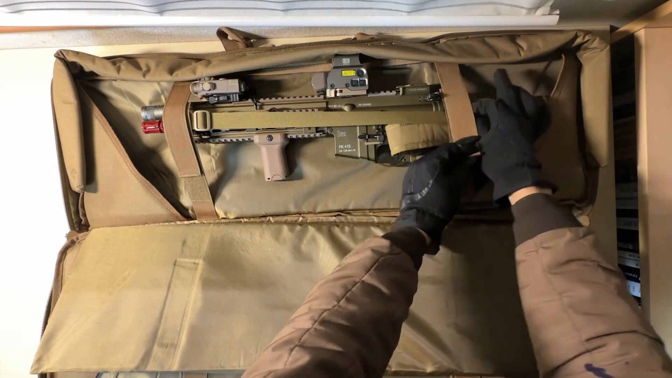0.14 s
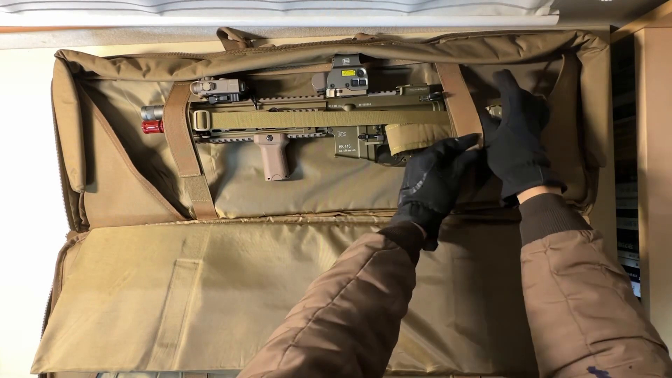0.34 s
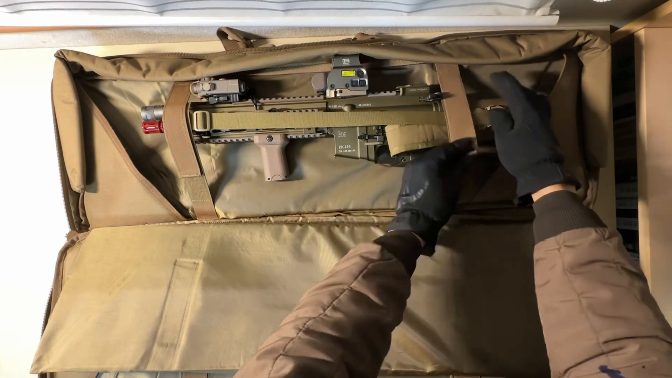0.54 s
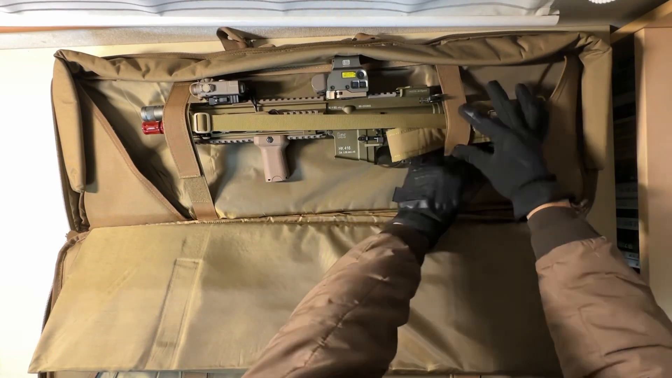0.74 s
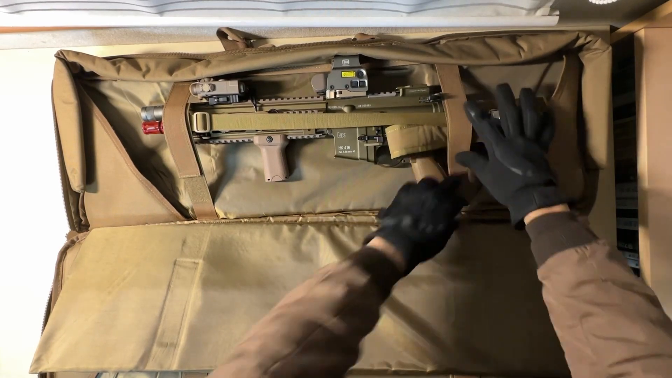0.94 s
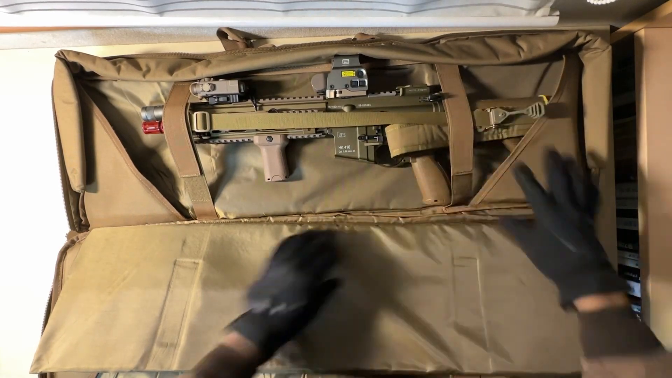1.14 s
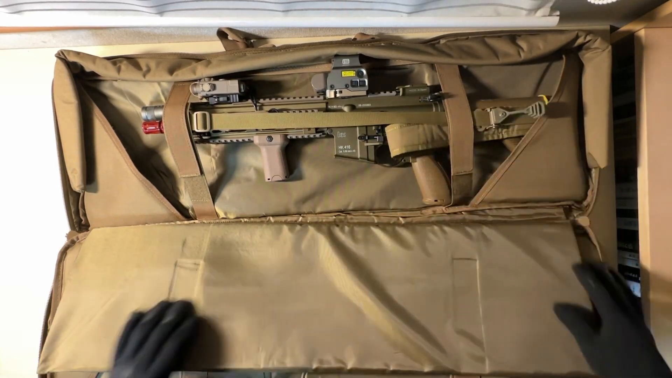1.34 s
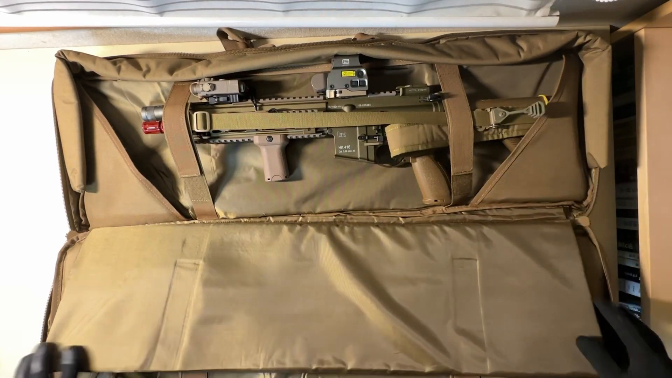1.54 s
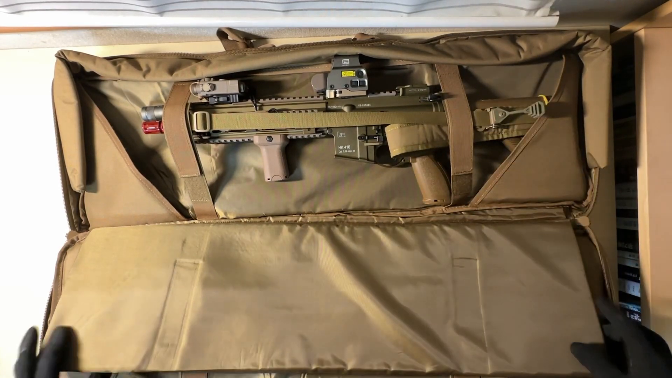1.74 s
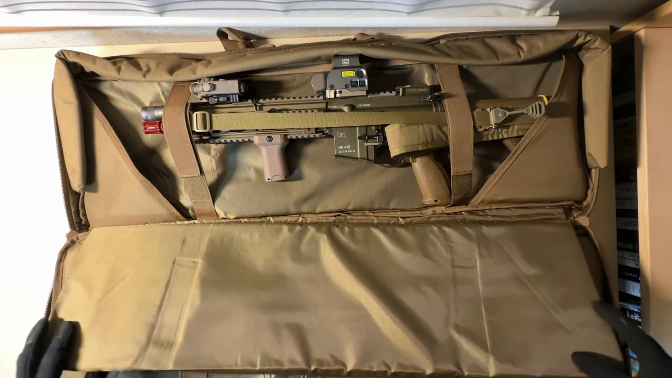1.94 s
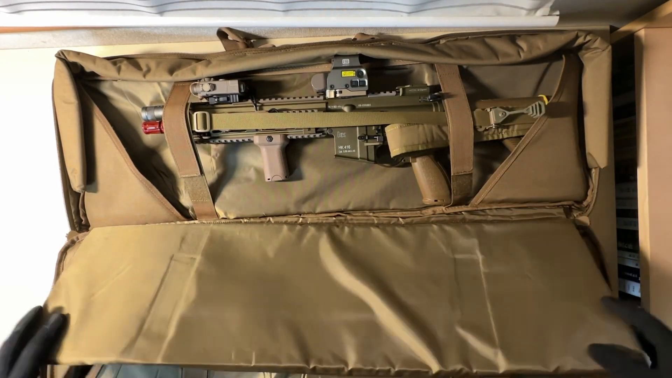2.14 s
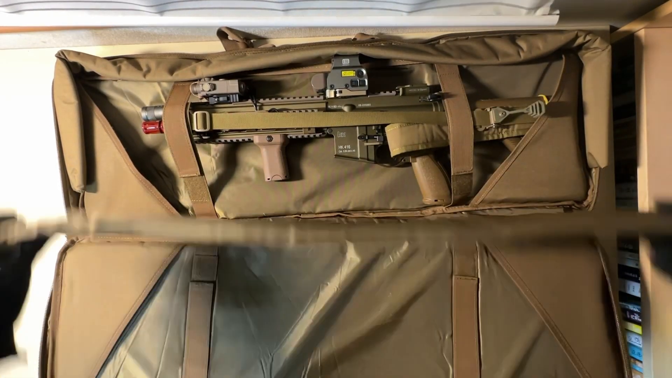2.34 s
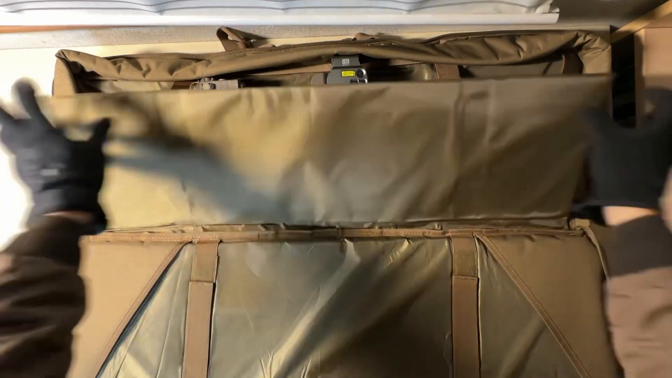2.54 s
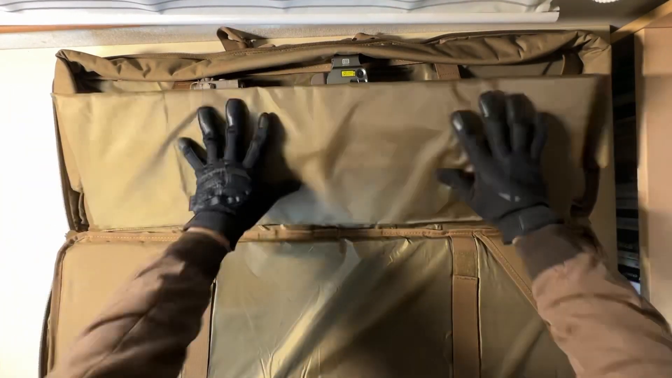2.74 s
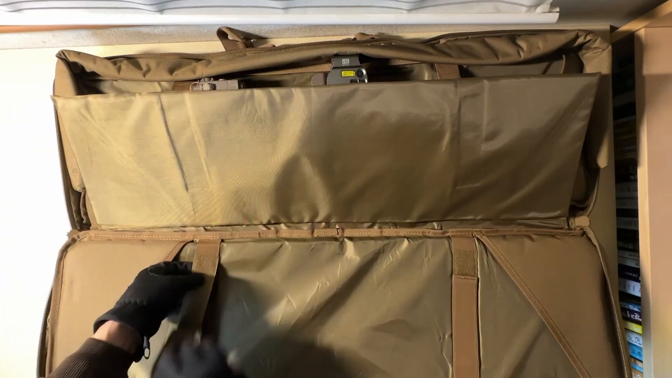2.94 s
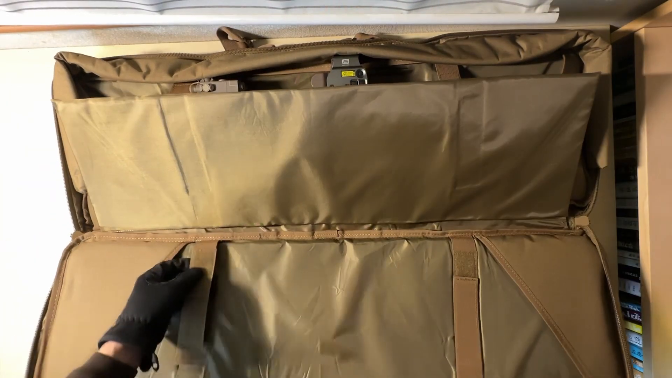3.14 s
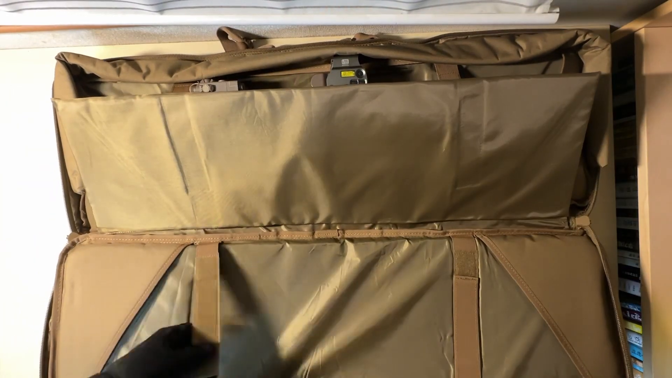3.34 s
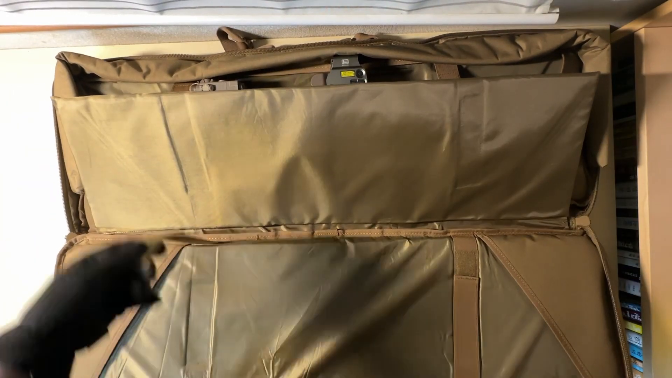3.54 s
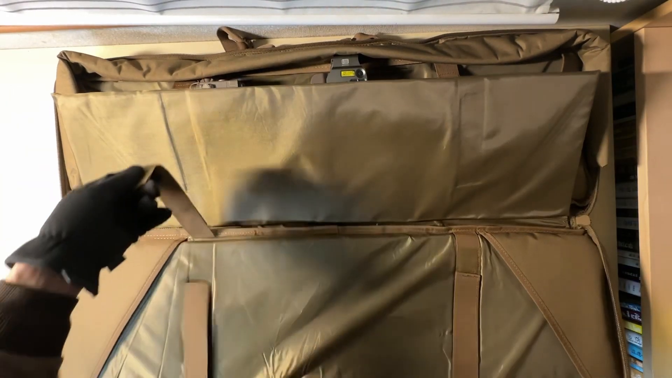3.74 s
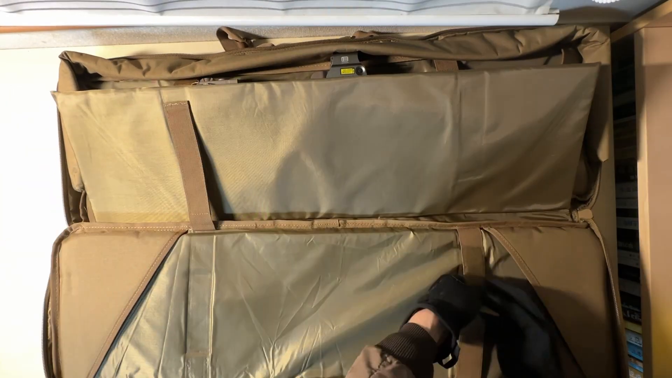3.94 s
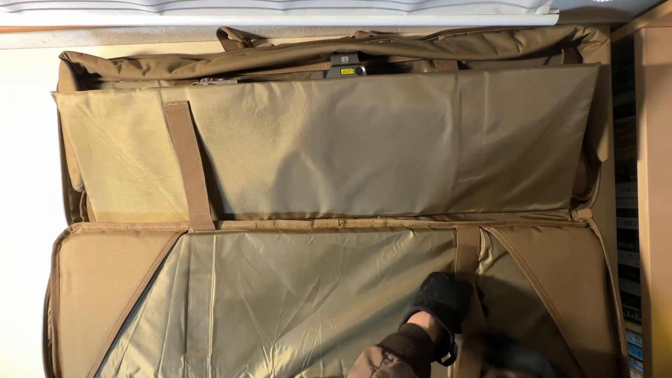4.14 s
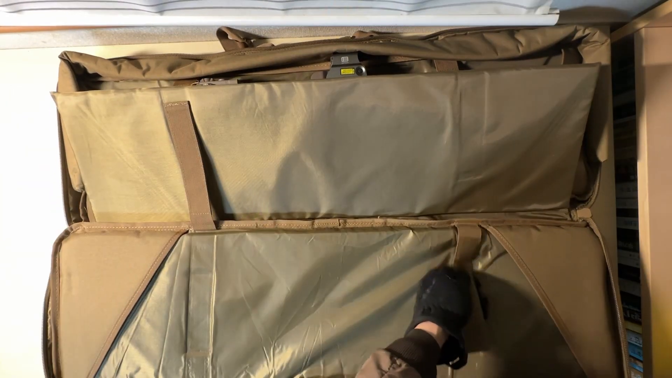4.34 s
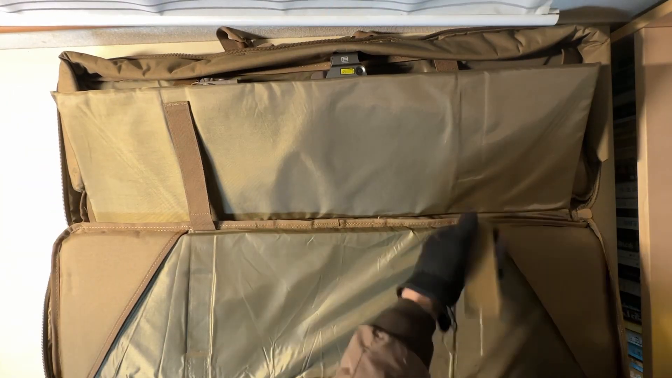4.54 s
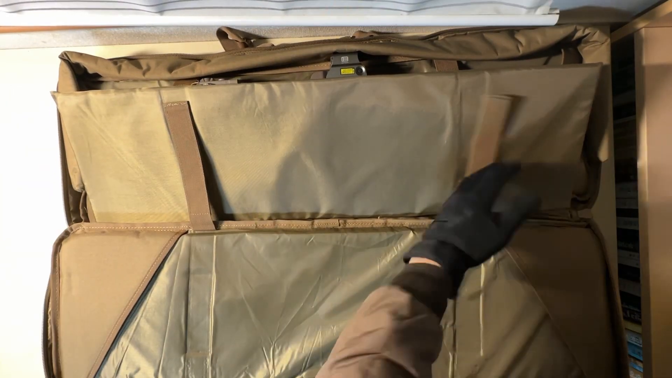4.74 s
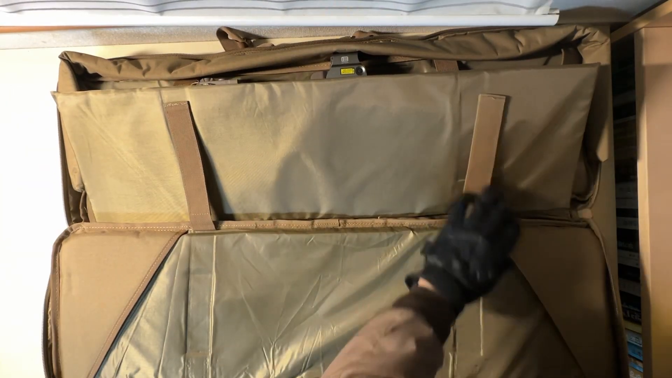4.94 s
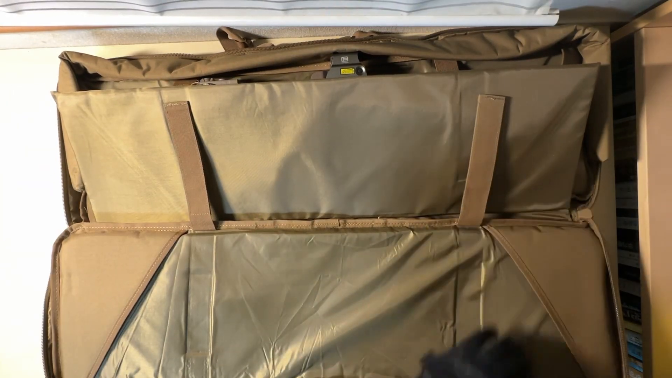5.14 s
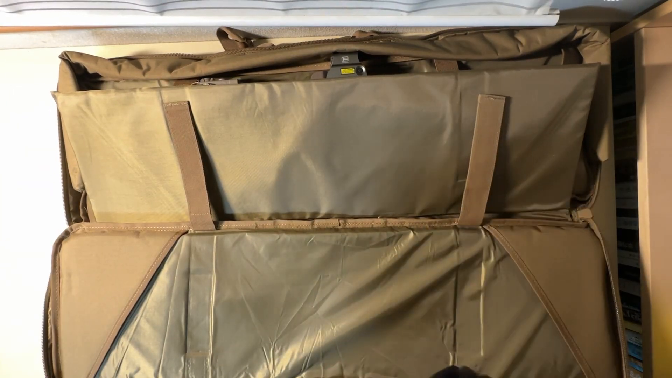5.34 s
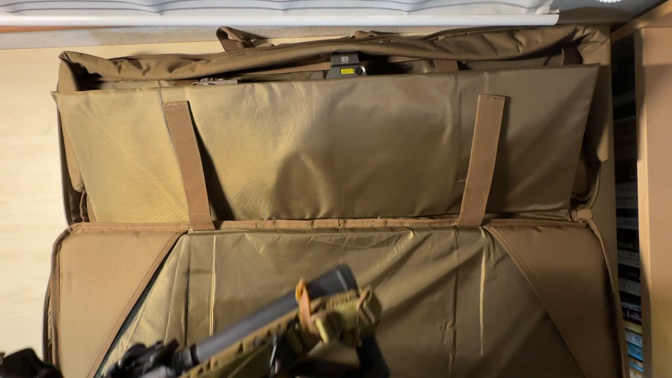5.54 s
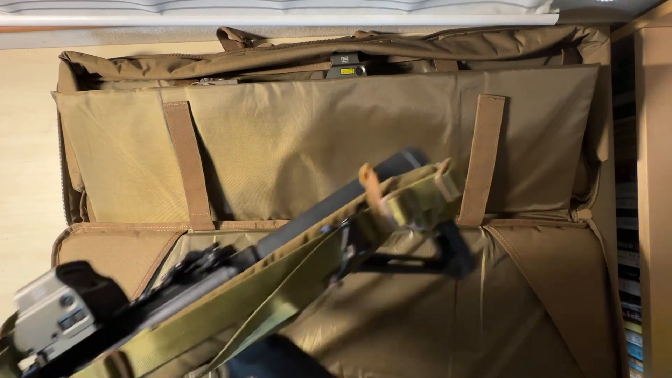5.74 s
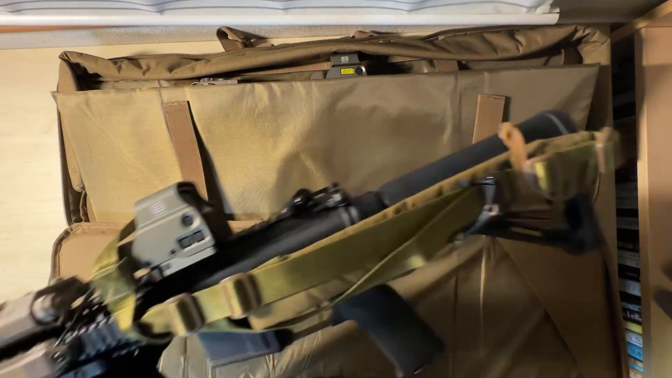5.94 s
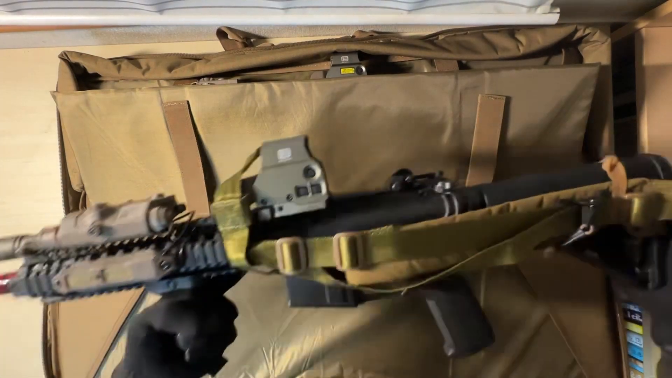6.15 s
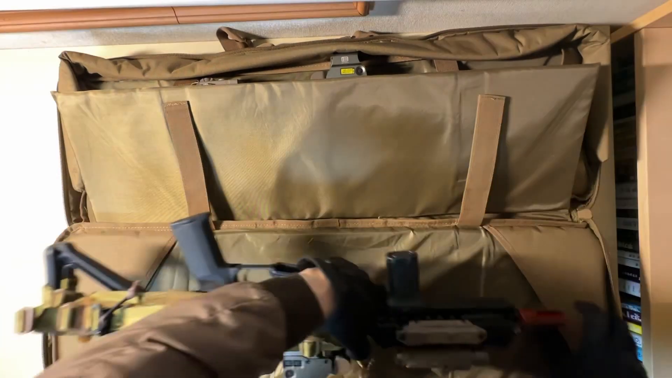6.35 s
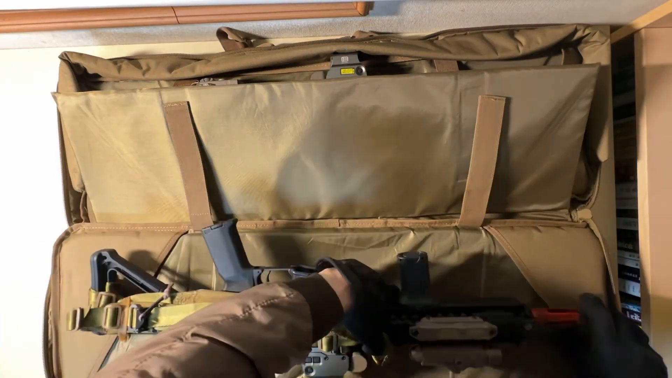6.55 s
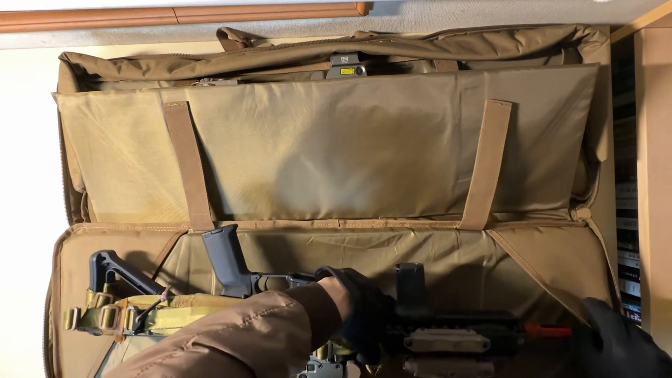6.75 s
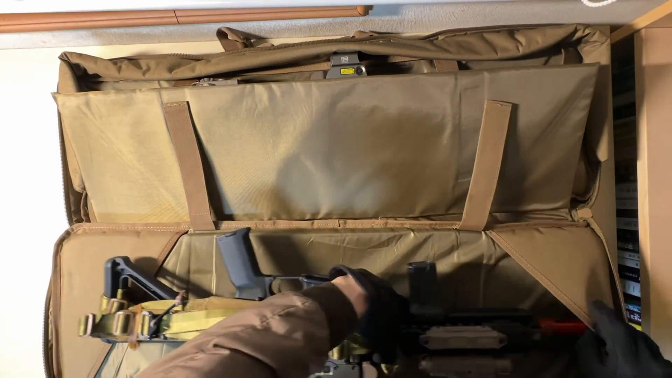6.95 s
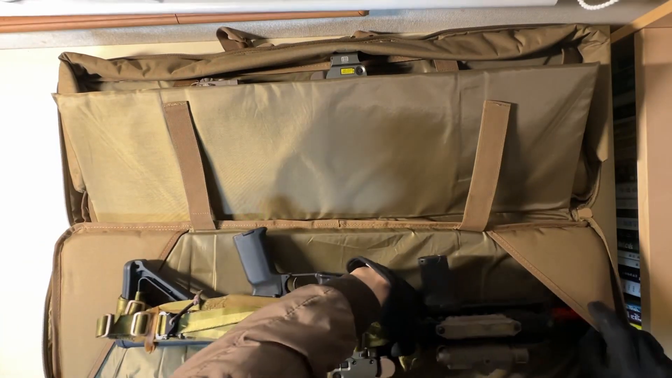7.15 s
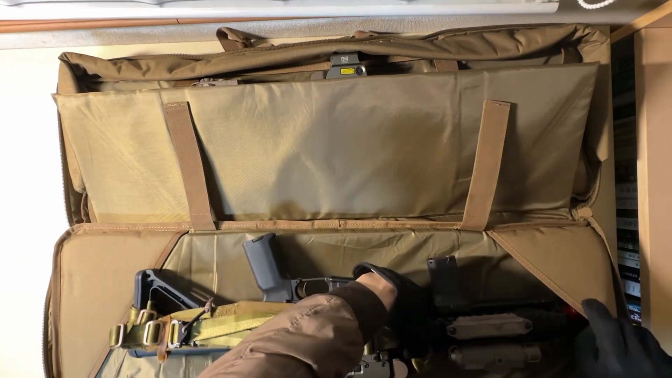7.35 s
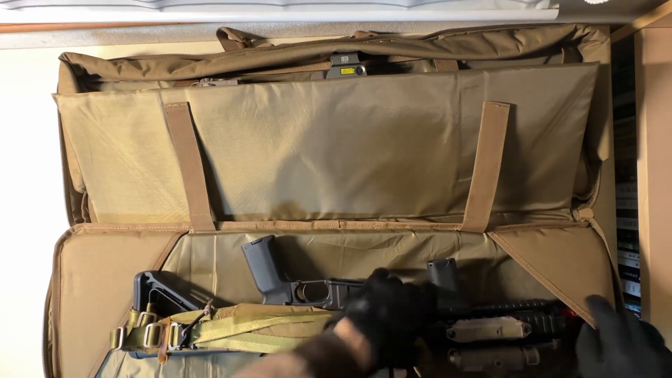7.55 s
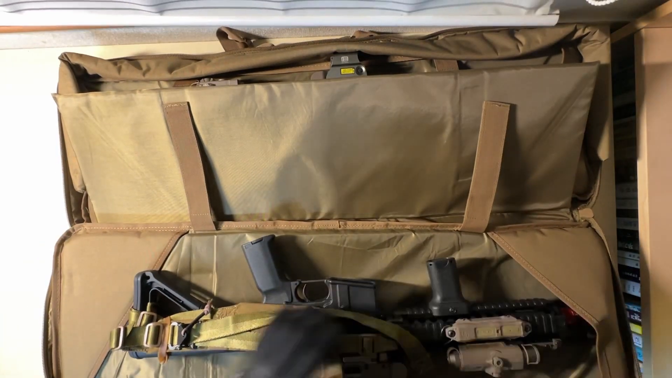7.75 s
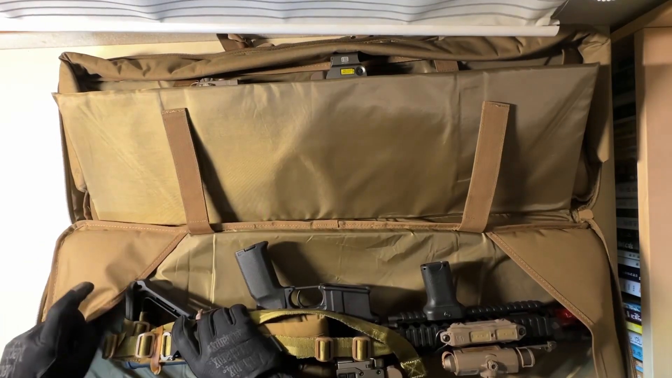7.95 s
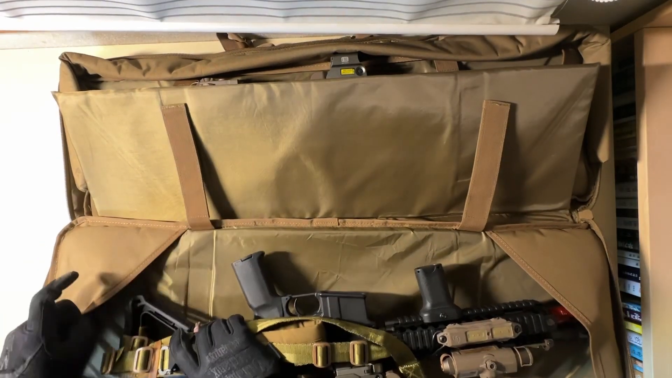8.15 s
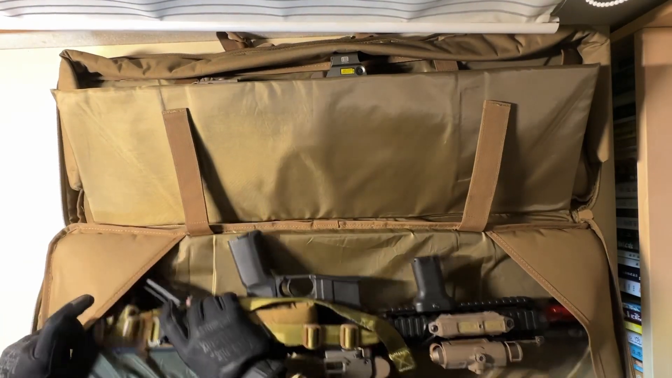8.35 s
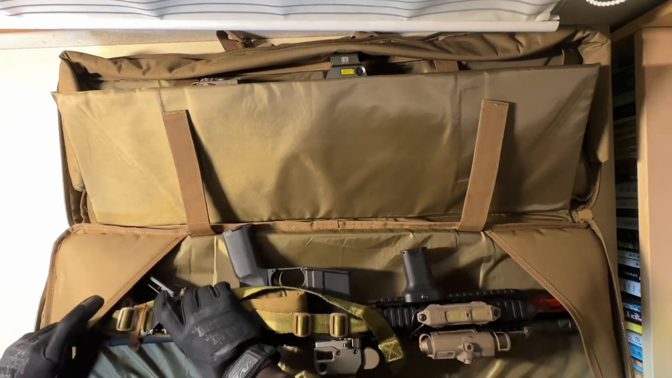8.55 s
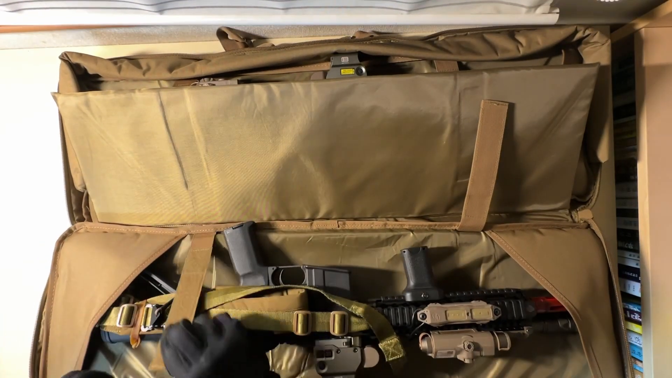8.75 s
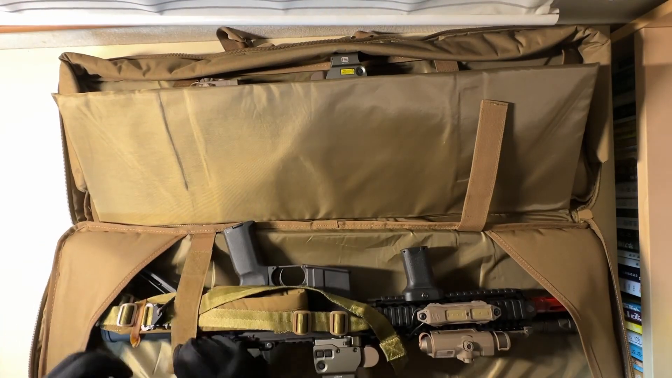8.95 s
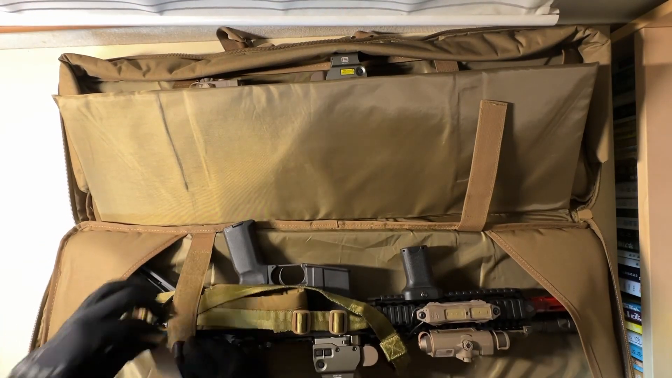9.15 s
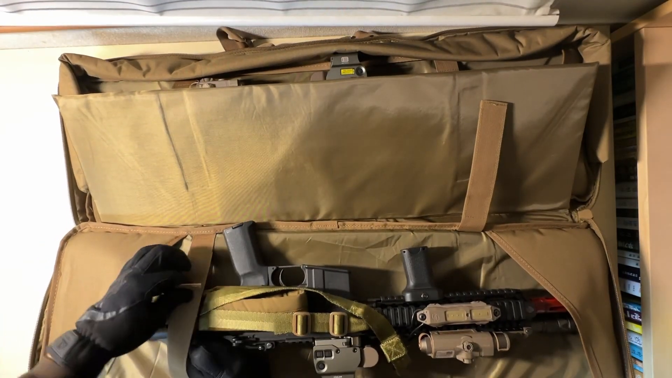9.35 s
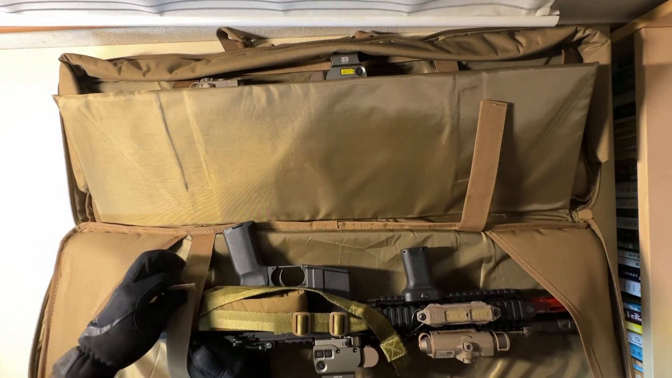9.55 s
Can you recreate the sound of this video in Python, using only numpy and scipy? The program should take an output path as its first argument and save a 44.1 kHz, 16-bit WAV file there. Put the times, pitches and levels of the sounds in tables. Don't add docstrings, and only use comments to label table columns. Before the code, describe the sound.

Quiet nylon rustling, then a loud hook-and-loop strap rips open, buckles rattle, a second strap tears and slaps down, followed by soft cloth handling and taps.

```python
import sys
import numpy as np
from scipy import signal
from scipy.io import wavfile
from scipy.ndimage import uniform_filter1d

SR = 44100
rng = np.random.default_rng(int(sys.argv[2]) if len(sys.argv) > 2 else 0)


def store_wav(level_fs):
    pcm = np.round(np.clip(np.atleast_2d(level_fs), -1, 1) * 32767)
    wavfile.write(sys.argv[1], SR, pcm.T.astype(np.int16))


def rack_gain(trim_db):
    fader = np.asarray(trim_db, float)
    return 10 ** (fader / 20)


N = 422911
SPAN_DB = 20


def evened(x):
    return x / np.sqrt(np.mean(x ** 2) + 1e-20)


def read(points, hz):
    f, value = np.transpose(points)
    return np.interp(np.log(hz + 1), np.log(f + 1), value)


def add(mix, s, sound):
    part = mix[max(round(s * SR), 0):][:len(sound)]
    part += sound[:len(part)]


def add_peak(mix, s, db, sound):
    add(mix, s, rack_gain(db) * sound / abs(sound).max())


def colour(x, points, lo_hz=20, hi_hz=20000):
    hz = np.fft.rfftfreq(4096, 1 / SR) + 1
    edges = np.sqrt((1 + (lo_hz / hz) ** 8) * (1 + (hz / hi_hz) ** 8))
    log_gain = np.log(rack_gain(read(points, hz)) / edges + 1e-5)
    full = signal.hilbert(np.r_[log_gain, log_gain[-2:0:-1]])
    impulse = np.fft.ifft(np.exp(np.conj(full))).real[:3000]
    return evened(signal.oaconvolve(x, impulse)[:N])


def resonate(x, hz, width_hz):
    turn = np.exp(2j * np.pi * hz * np.arange(len(x)) / SR)
    r = np.exp(-np.pi * width_hz / SR)
    return 2 * (turn * signal.lfilter([1 - r], [1, -r], x / turn)).real


def steep(x, hz, width_hz):
    return resonate(resonate(x, hz, width_hz), hz, 3 * width_hz)


def flutter(per_s, count=N):
    noise = uniform_filter1d(rng.standard_normal(count), size=40)
    return evened(signal.lfilter([1], [1, -np.exp(-2 * np.pi * per_s / SR)], noise))


def snaps(per_s, spread_db):
    size = rack_gain(spread_db * np.minimum(rng.exponential(1, N), 4))
    return size * rng.standard_normal(N) * (rng.random(N) < per_s / SR)


def patchy(x, patchy_db):
    z = signal.stft(x, nperseg=512)[2]
    patches = uniform_filter1d(rng.standard_normal(z.T.shape), size=9, axis=0)
    patches = uniform_filter1d(patches, size=5, axis=1)
    return signal.istft(z * rack_gain(patchy_db * evened(patches).T), nperseg=512)[1][:N]


def swells(rows, breaks_s):
    t = np.arange(0, N, 32) / SR
    breaks_s = np.sort(breaks_s)
    s, db, rise_s, fall_s = np.transpose(rows)[:, :, None]
    gain = rack_gain(db - SPAN_DB * np.maximum((s - t) / rise_s, (t - s) / fall_s))
    gain = gain * (np.searchsorted(breaks_s, s) == np.searchsorted(breaks_s, t))
    return np.interp(np.arange(N) / SR, t, uniform_filter1d((gain ** 2).sum(0), size=14))


def blows(rows, sag, sag_s, rise_s):
    out, t = np.zeros(N), np.arange(round(.4 * SR)) / SR
    for s, db, hz, t60_s in rows:
        turns = np.cumsum(hz * (1 + sag * np.exp(-t / sag_s))) / SR
        swing = np.sin(2 * np.pi * turns) * rack_gain(-60 * t / t60_s) * (1 - np.exp(-t / rise_s))
        add_peak(out, s, db, swing)
    return out


# time in seconds, level in dB.
STRAP_BACKING_LEVELS = [
    [(2.878, -34), (3.08, -28.5), (3.1, -37)],
    [(4.032, -39), (4.118, -29.5), (4.338, -34), (4.37, -29)],
]
# peak in seconds, peak in dB, build-up in seconds.
FIRST_STRAP_TEARS = [(2.881, -13.5, 0.0044), (2.903, -7.5, 0.0069), (2.9234, -9, 0.0074),
                     (2.9464, -4, 0.011), (2.962, -2.5, 0.0084), (2.983, -2.5, 0.016), (2.997, -3.5, 0.01),
                     (3.011, -2.5, 0.0081), (3.0254, -8.5, 0.0051), (3.046, 0, 0.015), (3.072, 0.5, 0.0066)]
SECOND_STRAP_TEARS = [(4.032, -17, 0.0024), (4.041, -17.5, .002), (4.133, -12.5, .006), (4.249, -10, .002),
                      (4.0603, -14.5, 0.0012), (4.076, -9.5, 0.0033), (4.102, -6.5, 0.0014),
                      (4.1204, -9.5, 0.0062), (4.1454, -10.5, 0.011), (4.163, -4.5, 0.01),
                      (4.182, -9.5, 0.015), (4.1984, -8, 0.0041), (4.2114, -8, 0.0076),
                      (4.236, -12, 0.0022), (4.2418, -0.5, 0.0024), (4.272, -8.5, 0.0056),
                      (4.292, -8, 0.0087), (4.307, -10, .001), (4.313, -8, 0.0024), (4.3287, -8.5, 0.0069),
                      (4.347, -12, 0.0091)]
# frequency in Hz, density in dB per Hz.
HOOK_SPECTRA = [
    [(880, -18.5), (1500, -13), (1840, -35.5), (2260, -21), (3150, -7), (3610, 0.5), (5560, 2),
     (7450, -1.5), (9700, 0.5), (15500, -11)],
    [(880, -24.5), (1500, -18.5), (2400, -5.5), (2750, -13), (3410, -4.5), (5290, -3), (6190, -2.5),
     (7380, -4), (9890, 2), (15500, -17)],
]
# frequency in Hz, density in dB per Hz.
BACKING_SPECTRUM = [(88, -28.5), (150, -5.5), (295, -10.5), (339, 0), (441, -9), (487, -3), (3000, -10.5),
                    (3900, -28.5), (6600, -120)]


def straps():
    t, power = np.arange(N) / SR, np.zeros(N)
    for s, db, build_s in FIRST_STRAP_TEARS + SECOND_STRAP_TEARS:
        near = slice(round((s - .03) * SR), round((s + .1) * SR))
        since = t[near] - s - .002
        power[near] += rack_gain(db - 12.5) ** 2 * np.exp(np.where(since < 0, since / build_s, -since / 0.0033))
    first = t < 3.5
    start_s = [rows[0][0] for rows in STRAP_BACKING_LEVELS]
    pull = np.sqrt(power) * rack_gain(np.where(first, 1.1, 1.8) * flutter(150))
    pull *= np.where(first, t > start_s[0], t > start_s[1])

    hooks = patchy(np.where(first, snaps(20000, 1.2), snaps(14000, 1.6)), 1.7)
    hooks = np.where(first, colour(hooks, HOOK_SPECTRA[0]), colour(hooks, HOOK_SPECTRA[1]))

    backing_gain = np.zeros(N)
    for rows in STRAP_BACKING_LEVELS:
        s, db = np.transpose(rows)
        backing_gain += rack_gain(np.interp(t, s, db)) * (t >= s[0]) * (t < s[-1])
    backing_gain = uniform_filter1d(backing_gain, size=60)
    jerks = pull / (uniform_filter1d(pull, size=3000) + 1e-9)
    backing = colour(snaps(5000, 1.7), BACKING_SPECTRUM)
    return pull * hooks + backing_gain * jerks ** 0.72 * backing


# start in seconds, peak in dB, low ring in Hz, tick in dB, t60 in seconds.
BUCKLE_KNOCKS = [(0.765, -38.5, 790, -56, 0.19), (2.594, -37.5, 590, -53, 0.099),
                 (3.163, -28, 1247, -48, 0.07), (3.177, -32, 1180, -53, 0.1), (3.26, -24, 1310, -55, 0.1),
                 (3.318, -8.5, 950, -36, 0.074), (3.359, -18.5, 830, -53, 0.13),
                 (3.679, -24.5, 720, -13.5, 0.055), (3.7105, -21, 800, -24.5, 0.2),
                 (3.778, -19.5, 920, -40, 0.12), (3.834, -31, 664, -53, 0.021),
                 (6.118, -29, 790, -43, 0.04), (6.147, -26.5, 890, -52, 0.034),
                 (6.511, -37, 1000, -43, 0.084), (7.043, -28, 1080, -40, 0.074),
                 (7.212, -29.5, 1280, -43, 0.027), (7.275, -29, 1280, -36, 0.022)]
# start in seconds, peak in dB, high ring in Hz, tick in dB, t60 in seconds.
SMALL_CLICKS = [(0.293, -39, 2280, -36, 0.04), (0.4, -35, 1610, -24, 0.02),
                (0.431, -30, 4500, -15.5, 0.032), (4.705, -21, 1500, -21, 0.034),
                (1.278, -35, 2080, -37, 0.63), (2.438, -32, 3250, -37, 0.018),
                (3.231, -29, 1390, -52, 0.048), (5.5073, -37, 3560, -48, 0.056),
                (0.192, -43, 2440, -35, 0.033), (8.5257, -33, 1680, -60, 0.082),
                (8.572, -35, 1730, -52, 0.03), (6.409, -44.5, 2080, -66, 0.067),
                (6.526, -33, 1610, -55, 0.11), (7.179, -37, 2340, -49, 0.045),
                (8.503, -36.5, 3930, -35, 0.03), (8.585, -34, 1610, -38, 0.051),
                (8.982, -32.5, 1680, -53, 0.076), (9.0375, -22.5, 1700, -53, 0.096),
                (9.268, -34, 2300, -30, 0.04)]
SHELL_HZ = 1430


def knocks():
    out, t = np.zeros(N), np.arange(round(.15 * SR)) / SR
    rows = [(s, db, hz, SHELL_HZ, tick_db, t60_s) for s, db, hz, tick_db, t60_s in BUCKLE_KNOCKS]
    rows += [(s, db, 0, hz, tick_db, t60_s) for s, db, hz, tick_db, t60_s in SMALL_CLICKS]
    tick_band = signal.butter(2, [2800, 9000], "bandpass", fs=SR)
    for s, db, low_hz, high_hz, tick_db, t60_s in rows:
        strikes = rng.standard_normal(len(t)) * rack_gain(-60 * t / t60_s) * (1 - np.exp(-t / .0004))
        strikes *= 1 + 1.2 * np.exp(-t / .003)
        ring = 0.63 * steep(strikes, high_hz, 360) + 0.058 * steep(strikes, 1.6 * high_hz, 510)
        if low_hz > 0:
            ring += steep(strikes, low_hz, 330)
        add_peak(out, s, db, ring)
        add_peak(out, s, tick_db, signal.lfilter(*tick_band, strikes))
    return out


# start in seconds, peak in dB, final pitch in Hz, t60 in seconds.
STRAP_SLAPS = [
    (4.7058, -9, 380, .025),
    (3.6805, -17, 335, .06),
]


def slaps():
    return blows(STRAP_SLAPS, sag=1.8, sag_s=.0012, rise_s=.0011)


# start in seconds, peak in dB, pitch in Hz, t60 in seconds.
PADDING_THUMPS = [(0.431, -26.5, 334, 0.069), (0.767, -31.5, 458, 0.074), (1.276, -42.5, 310, 0.14),
                  (2.6, -26, 217, 0.039), (2.785, -22, 299, 0.15), (3.131, -16, 380, 0.04),
                  (3.151, -19.5, 221, 0.073), (3.272, -20.5, 150, 0.18), (3.274, -17.5, 372, 0.087),
                  (3.684, -24, 345, 0.12), (4.716, -32, 430, 0.059), (6.512, -32.5, 373, 0.095),
                  (8.582, -34.5, 470, 0.13), (9.034, -22, 149, 0.095)]


def thumps():
    out, t = np.zeros(N), np.arange(round(.2 * SR)) / SR
    for s, db, hz, t60_s in PADDING_THUMPS:
        crumpling = rng.standard_normal(len(t)) * rack_gain(-60 * t / t60_s)
        push = t / 0.0012 * np.exp(-t / 0.00027) + 0.12 * crumpling
        swing = steep(push, hz, 6.5 / t60_s + 40)
        swing += 0.22 * steep(push, 0.628 * hz, 57) + 0.19 * steep(push, 1.563 * hz, 214)
        add_peak(out, s, db, swing)
    return out


# peak in seconds, peak in dB, pitch in Hz, rise in seconds, fall in seconds.
WEAVE_TAPS = [(6.119, -28, 1890, 0.0025, 0.011), (6.12, -35, 4000, .002, .006),
              (6.1375, -30, 1700, 0.0023, .005), (6.148, -24, 1880, .002, .006),
              (6.154, -36, 2000, 0.0026, 0.0071), (6.1665, -25.5, 1770, .002, 0.0067),
              (6.1928, -31, 2070, 0.002, .005), (6.198, -36, 2490, .003, 0.0086),
              (6.501, -34, 3020, 0.00084, .006), (6.512, -28.5, 4200, .001, .005),
              (6.518, -31, 3200, .002, .005), (6.526, -26, 3800, 0.00092, .004),
              (6.529, -25, 2200, .002, 0.0045), (6.535, -24, 4500, 0.0027, 0.0046),
              (6.534, -24, 1800, 0.0033, 0.0068), (6.54, -26, 1690, .003, .006),
              (8.501, -26.5, 4300, .001, 0.0045), (8.587, -36.5, 4500, .002, 0.0092),
              (8.587, -28, 1410, .002, 0.0071), (4.383, -28, 1200, 0.0053, .008),
              (.4355, -15, 4530, .001, .004), (.158, -42, 2800, .002, .008),
              (2.599, -41, 1500, 0.0018, .015), (3.712, -27, 1490, .002, .015)]
GRIT_BURSTS = [(3.168, -27, 1700, .012, .015), (3.18, -23.5, 1250, .01, .02), (3.19, -31, 1850, .02, 0.027),
               (3.233, -36, 1700, .008, .03), (3.263, -21, 1420, .012, 0.014),
               (3.29, -26.5, 1390, .03, 0.043), (3.323, -17, 1560, .006, 0.018),
               (3.328, -33, 2770, .01, 0.026), (3.342, -22, 1490, .02, 0.026),
               (3.37, -23, 990, .015, 0.026), (3.385, -38.5, 1880, .03, 0.053),
               (4.713, -22, 1310, .004, 0.0079), (4.735, -37.5, 1090, .03, 0.042),
               (.312, -33.5, 2070, .02, .01), (.4, -37, 2800, .03, .015), (.2, -39, 2480, .04, 0.041),
               (6.565, -35, 1400, .02, 0.034),
               (4.728, -30, 260, .02, .08), (5.42, -40, 200, .06, .08), (5.465, -41, 230, .06, .02),
                 (5.04, -36, 230, .03, .08), (2.599, -30, 700, .006, .015), (2.614, -27, 450, .008, .03),
                 (2.772, -29, 400, .015, .03), (2.794, -30, 3500, .001, .006), (2.8, -23, 500, .015, .04),
                 (3.692, -26, 3000, .008, .012), (3.684, -24, 4800, .004, .04),
                 (3.715, -29, 6600, .005, .02), (3.765, -30, 1200, .03, .03), (3.768, -33, 6500, .03, .02),
                 (3.837, -27, 800, .04, .006), (3.797, -34, 5600, .01, .02), (7.181, -33, 6000, .002, .008),
                 (7.213, -30, 5000, .001, .006), (7.277, -26, 4000, .001, .004),
                 (5.785, -42, 4800, .02, .05), (.682, -39, 520, .004, .03), (.954, -41, 540, .004, .03),
                 (6.305, -48, 5500, .01, .015), (6.39, -49, 3500, .01, .02), (9.29, -38, 9000, .005, .02),
                 (9.3, -37, 4800, .03, .02), (9.427, -46, 7000, .003, .015), (9.482, -40, 8500, .03, .02),
                 (9.01, -40, 1000, .03, .03), (9.237, -43, 4800, .003, .01), (4.709, -17, 750, .003, .008),
                 (5.51, -36, 3400, .012, .02), (5.16, -46, 3600, .03, .05), (1.84, -44, 800, .02, .04),
                 (1.87, -45, 4500, .03, .04), (.445, -26, 4400, .02, .03), (2.904, -14, 5000, .002, .004),
                 (2.881, -20, 6000, .001, .006)]


def rasps():
    out, t = np.zeros(N), np.arange(-.05, .1, 1 / SR)
    for s, db, hz, rise_s, fall_s in WEAVE_TAPS + GRIT_BURSTS:
        grit = rng.standard_normal(len(t)) * rack_gain(-SPAN_DB * np.maximum(-t / rise_s, t / fall_s))
        ring = steep(grit, hz, 0.38 * hz) + 0.093 * steep(grit, 1.89 * hz, 0.5 * hz)
        add_peak(out, s + t[0], db, ring)
    return out


# start in seconds, peak in dB.
LOOP_SNAGS = [(.021, -31.5), (0.232, -40), (.417, -27), (0.45, -20), (.563, -40.5), (4.915, -35),
              (4.934, -38), (4.948, -33), (4.975, -35), (7.868, -51), (9.206, -42), (9.305, -31.5),
              (9.3397, -28.5), (9.469, -43), (9.4985, -30.5)]


def snags():
    out, t = np.zeros(N), np.arange(round(.05 * SR)) / SR
    band = signal.butter(1, [3000, 11000], "bandpass", fs=SR)
    for s, db in LOOP_SNAGS:
        crackle = rng.standard_normal(len(t)) * rack_gain(-60 * t / 0.036)
        add_peak(out, s, db, signal.lfilter(*band, crackle))
    return out


# frequency in Hz, density in dB per Hz.
CLOTH_SPECTRUM = [(71, -31.5), (120, -0.5), (282, 2.5), (509, 1.5), (846, -3.5), (1720, -4), (2700, -9),
                  (4000, -3.5), (7450, -13), (9910, -12), (12400, -24.5), (15500, -20.5)]
LAYER_EDGES_HZ = (170, 700, 2500, 7500, 11500, 16500)
# peak in seconds, peak in dB, rise in seconds, fall in seconds.
SCRAPE_STROKES = [(.4, -46.5, 0.084, 0.12), (.45, -42.5, 0.12, 0.041), (1.29, -47.5, 0.058, 0.43),
                  (1.51, -54.5, 0.19, 0.24), (3.09, -38.5, .01, 0.083), (3.681, -36.5, .002, 0.11),
                  (4.03, -47, 0.058, .005), (4.36, -39.5, 0.022, 0.18), (4.6, -48.5, 0.071, 0.12),
                  (6.97, -46, .22, .4), (7.09, -44, 0.3, 0.1), (7.2, -42, 0.1, 0.26),
                  (7.3, -43, 0.41, 0.12), (8.34, -42.5, 0.12, 0.64), (8.42, -40.5, 0.66, .5),
                  (9.5, -56.5, 0.11, 0.13)]
RUSTLE_STROKES = [(0.301, -51.5, 0.015, 0.055), (.76, -51, 0.28, 0.11), (0.951, -62, 0.28, 0.76),
                  (1.88, -58, 0.4, 0.52), (2.631, -50.5, 0.41, 0.06), (2.798, -40, 0.073, 0.11),
                  (3.901, -64.5, 0.26, 0.82), (6.06, -65.5, 0.77, 0.2), (6.138, -51, 0.039, 0.11),
                  (6.68, -53, 0.42, 0.31), (8.089, -48, 0.084, 0.17), (7.549, -54.5, 0.57, 0.22),
                  (7.84, -57, .1, 0.64), (7.949, -49.5, 0.29, 0.056), (9.09, -56.5, 0.74, 0.15),
                  (9.33, -53.5, 0.36, 0.083)]
PRESS_STROKES = [(2.409, -58.5, 0.08, 0.44), (3.17, -51, .1, 0.21), (3.27, -46, .05, 0.15),
                 (3.38, -58.5, .3, 0.064), (3.8, -50.5, 0.32, 0.3), (4.73, -60, 0.11, 0.32),
                 (5.038, -56.5, 0.06, 0.13), (5.45, -64.5, 0.49, 0.17), (8.72, -63, .15, 0.055)]
SIZZLE_STROKES = [(0.002, -45, 0.0072, 0.03), (2.545, -45, 0.1, 0.018), (3.58, -54, 0.094, 0.4),
                  (3.66, -61, 0.27, 0.014), (4.5, -48, 0.012, 0.047), (4.98, -51.5, 0.29, 0.027),
                  (6.94, -43.5, 0.2, 0.31), (6.74, -47, 0.25, 0.078), (0.2, -51.5, 0.25, 0.12),
                  (5.36, -65, 0.2, 0.47)]
BRUSH_STROKES = [(2.24, -39.5, 0.064, 0.1), (5.501, -55.5, 0.0099, 0.11), (5.8, -60, 0.055, 0.066),
                 (6.528, -41, 0.051, 0.075), (8.6, -51, 0.2, 0.098), (8.73, -53.5, 0.091, 0.041),
                 (2.03, -53, 0.35, 0.078), (2.14, -57.5, 0.17, 0.21)]
# padding in dB, creasing in dB, scrape in dB, sizzle in dB, air in dB.
STROKE_LAYERS = [
    (-8.5, -3.5, -0.73, -6, -11.5),
    (0, 1.5, -0.8, -5, -10),
    (10.5, 4.5, -1.5, -5.5, -11.5),
    (-8, -2.5, -0.5, -0.5, -2.3),
    (-7.5, -2, -0.1, -13, -22),
]
SCENE_CHANGES_S = (1.257, 3.845, 5.49, 7.817)
HAND_LIFTS_S = (2.735, 6.83, 7.36, 8.055, 8.525)


def cloth():
    kinds = (SCRAPE_STROKES, RUSTLE_STROKES, PRESS_STROKES, SIZZLE_STROKES, BRUSH_STROKES)
    stroke_powers = np.array([swells(rows, SCENE_CHANGES_S + HAND_LIFTS_S) for rows in kinds])
    layer_gains = np.sqrt(rack_gain(np.transpose(STROKE_LAYERS)) ** 2 @ stroke_powers)
    drag, out = rack_gain(1.1 * flutter(17)), np.zeros(N)
    for k, gain in enumerate(layer_gains):
        threads = snaps(9000, 0.84) * rack_gain(1.0 * flutter(26))
        out += drag * gain * colour(threads, CLOTH_SPECTRUM, *LAYER_EDGES_HZ[k:k + 2])
    return patchy(out, 2.0)


# frequency in Hz, level in dB rms.
SPRING_LINES = [(287, -53), (377, -55), (475, -52), (569, -56), (180, -60), (665, -63), (1321, -64),
                (612, -62), (1086, -70), (1283, -72), (2480, -74)]


def spring():
    start_s, stop_s, t60_s = 5.01, 5.485, 1.55
    out, t = np.zeros(N), np.arange(0, stop_s - start_s, 1 / SR)
    shape = rack_gain(8.5 - 60 * t / t60_s) * np.clip(t / 0.008, 0, 1) * np.clip((t[-1] - t) / 0.0087, 0, 1)
    for hz, db in SPRING_LINES:
        waver_db = uniform_filter1d(3.0 * flutter(8, count=SR // 2), size=700)[:len(t)]
        line = np.sin(2 * np.pi * (hz * t + rng.random()))
        add(out, start_s, shape * rack_gain(db + waver_db) * line)
    return out


# start in seconds, peak in dB, pitch in Hz, t60 in seconds.
FLOOR_LANDINGS = [(3.081, -27, 65, 0.35), (3.271, -25, 120.6, 0.28), (3.687, -32.5, 83, 0.32),
                  (5.075, -36, 66, .9), (6.542, -36, 62, 0.19), (6.558, -29, 61, 0.17),
                  (8.591, -37, 66, 0.25), (9.039, -33, 73.4, 0.12)]


def landings():
    return blows(FLOOR_LANDINGS, sag=0.058, sag_s=.007, rise_s=0.0062)


# frequency in Hz, width in Hz, level in dB.
FLOOR_RESONANCES = [(55, 7.6, 5), (69.7, 13.6, 3), (101.8, 30, -3), (145, 2.8, -23)]
# peak in seconds, peak in dB, rise in seconds, fall in seconds.
WEIGHT_SHIFTS = [(0.01, -47.5, 0.094, 1.5), (.44, -44.5, .07, 0.28), (.81, -46, .2, 0.3),
                 (1.29, -39, 0.34, 0.21), (1.96, -49, 1.2, 0.27), (2.27, -50.5, 0.1, 0.76),
                 (3.08, -34, 0.55, 0.86), (3.73, -42, 0.2, 0.33), (4.2, -42, 0.39, 2.4),
                 (5.07, -38, 0.093, 0.71), (5.95, -61, 0.54, 0.64), (6.6, -40, 0.18, 0.056),
                 (7.4, -49, 2, .4), (8.3, -46.5, 0.93, 0.048), (8.6, -46.5, 0.48, 0.4),
                 (9.08, -40.5, 0.19, 0.099), (9.4, -53, 1.1, 0.89)]


def tremble():
    rest_db = -65
    push, modes = rng.standard_normal(N), np.zeros(N)
    for hz, width_hz, db in FLOOR_RESONANCES:
        modes += rack_gain(db) * evened(resonate(resonate(push, hz, width_hz), hz, 2 * width_hz))
    return np.sqrt(swells(WEIGHT_SHIFTS, SCENE_CHANGES_S) + rack_gain(rest_db) ** 2) * evened(modes)


# frequency in Hz, density in dB per Hz.
HISS_SPECTRUM = [(59, -10), (100, 3.5), (347, -7.5), (420, -6), (7410, -15.5), (9740, -23.5),
                 (15500, -35.5)]


def background_hiss():
    return rack_gain(-74) * colour(rng.standard_normal(N), HISS_SPECTRUM)


# frequency in Hz, t60 in seconds.
ROOM_DECAY = [(200, 0.14), (1000, 0.11), (4000, 0.067), (12000, 0.11)]
# delay in seconds, level in dB.
EARLY_ECHOES = [
    (.0013, -35.5),
    (.0029, -32.5),
    (.0052, -15),
    (.0091, -21),
]


def room(x):
    tail_db, change_s = -15, 3.845
    taps = np.zeros(SR // 2)
    at = np.arange(600, len(taps) - 20, 20)
    taps[at + rng.integers(0, 20, len(at))] = rng.choice([-1., 1.], len(at))
    hz, t, z = signal.stft(taps, SR, nperseg=256)
    tail = signal.istft(z * rack_gain(-60 * t / read(ROOM_DECAY, hz)[:, None]), SR, nperseg=256)[1]
    tail *= rack_gain(tail_db) / np.linalg.norm(tail)
    tail[0] = 1
    for k, (s, db) in enumerate(EARLY_ECHOES):
        tail[round(s * SR)] = (-1) ** k * rack_gain(db)
    tail /= np.linalg.norm(tail)
    before = np.arange(N) < change_s * SR
    heard_before = signal.fftconvolve(x * before, tail)[:N]
    heard_after = signal.fftconvolve(x * ~before, tail)[:N]
    return heard_before * before + heard_after


def scene():
    near = straps() + knocks() + thumps() + rasps() + snags() + cloth()
    low = slaps() + landings() + tremble()
    return (room(near) + spring() + low + background_hiss())[None]


def band_limit(x):
    return signal.sosfilt(signal.butter(12, 16640, fs=SR, output="sos"), x)


# frequency in Hz, width in Hz, depth from 0 to 1.
HOUSING_NOTCHES = [(5200, 200, .8), (7550, 450, .75)]


def record(dry):
    x = dry[0]
    for hz, width_hz, depth in HOUSING_NOTCHES:
        x = x - depth * resonate(x, hz, width_hz)
    x = signal.sosfilt(signal.butter(2, 36, "highpass", fs=SR, output="sos"), x)
    x = .62 * np.tanh(x / .62)
    x = signal.oaconvolve(x, signal.firwin(401, 15800, window=("kaiser", 10), fs=SR), "same")
    return band_limit(x[None])


dry = scene()
out = record(dry)
store_wav(out)
```